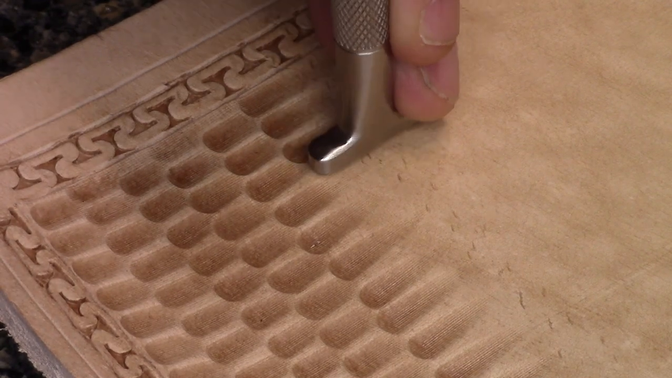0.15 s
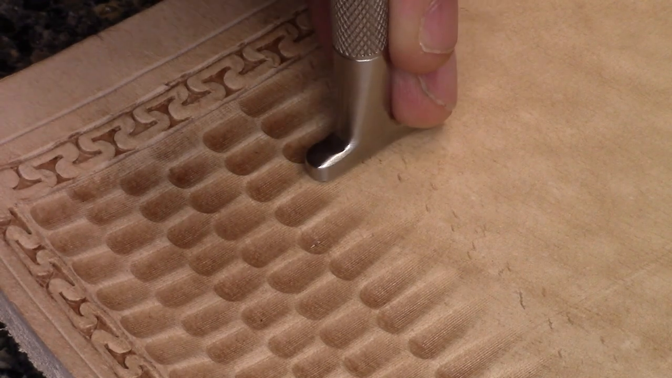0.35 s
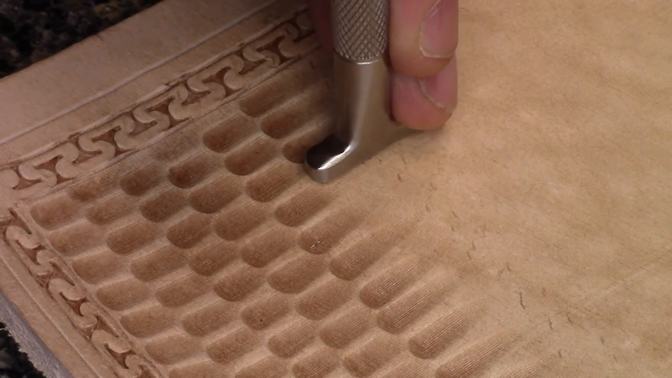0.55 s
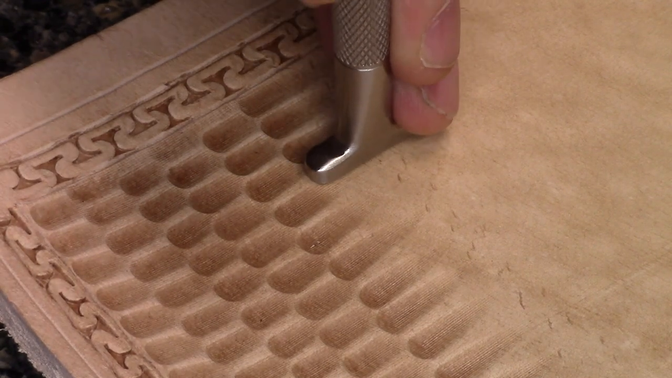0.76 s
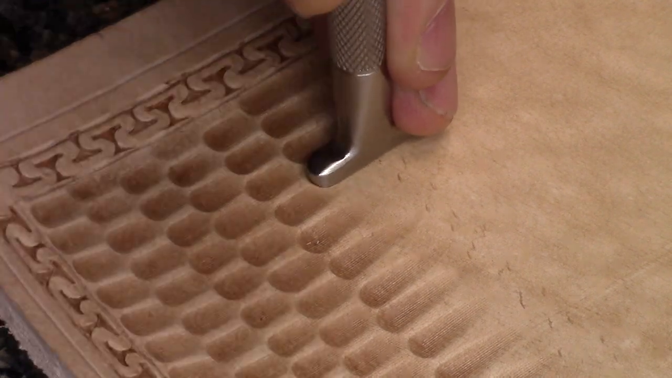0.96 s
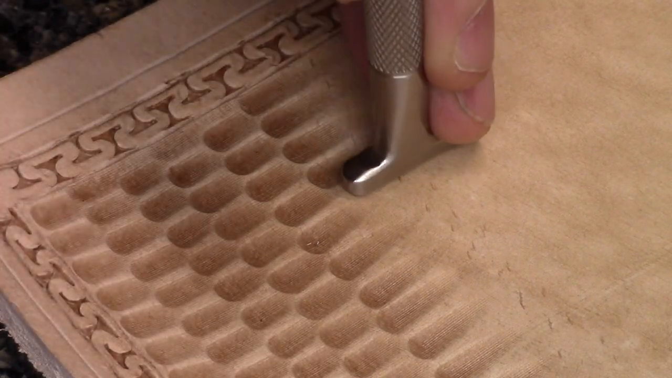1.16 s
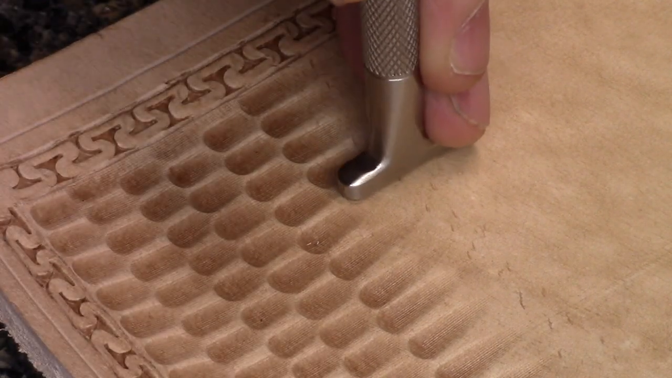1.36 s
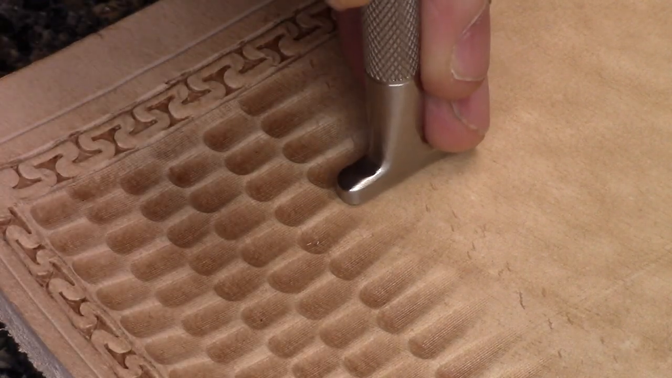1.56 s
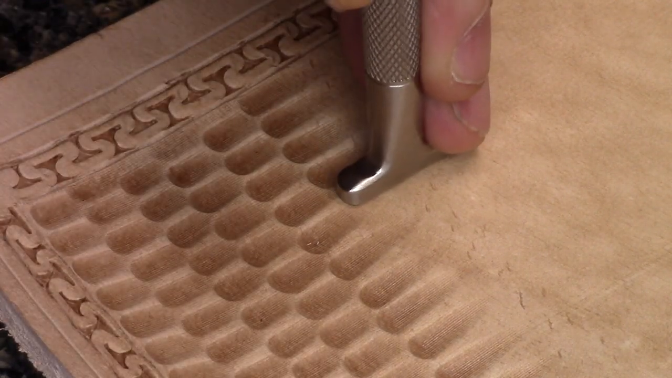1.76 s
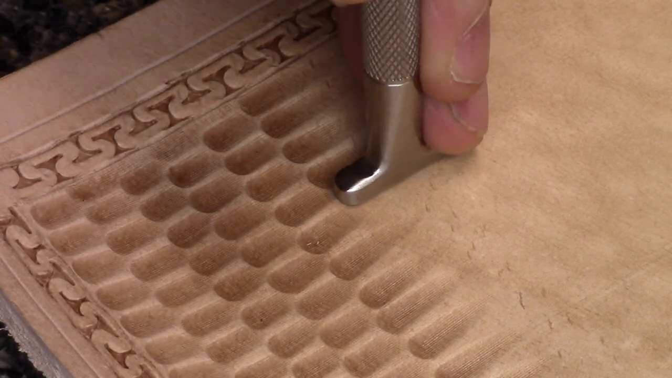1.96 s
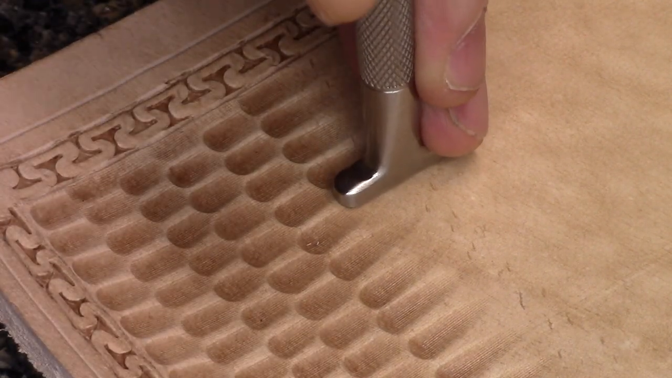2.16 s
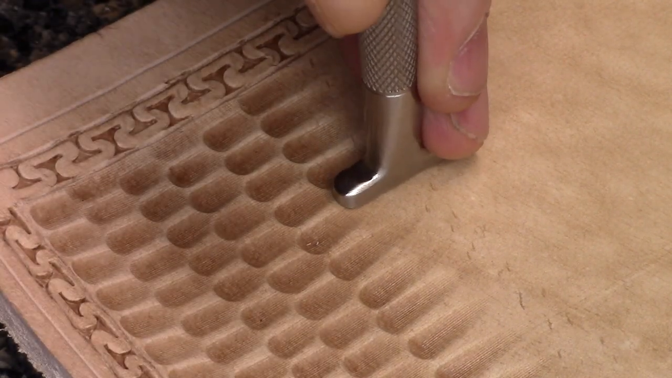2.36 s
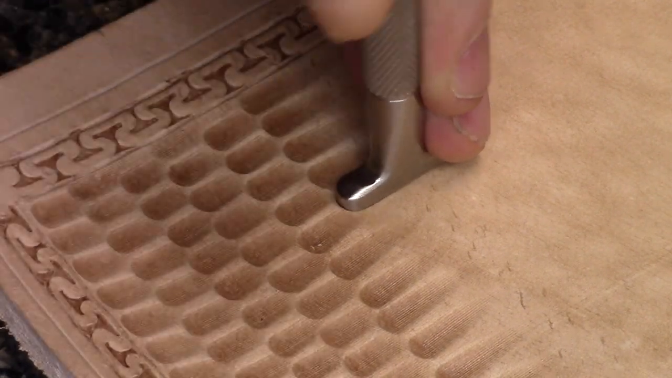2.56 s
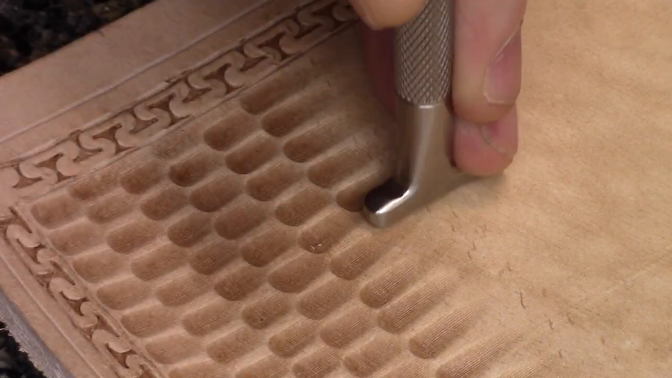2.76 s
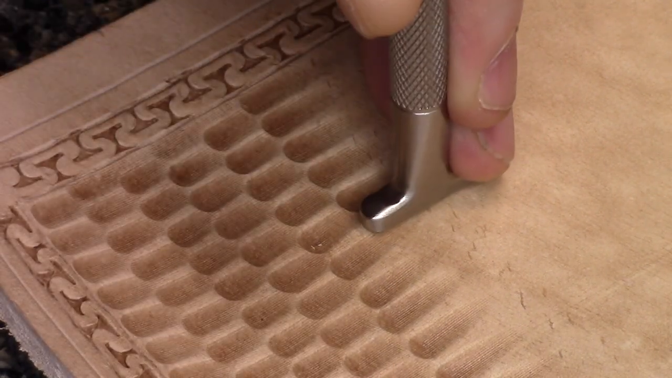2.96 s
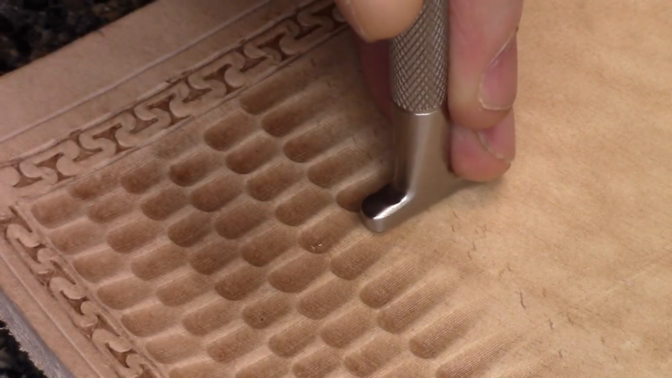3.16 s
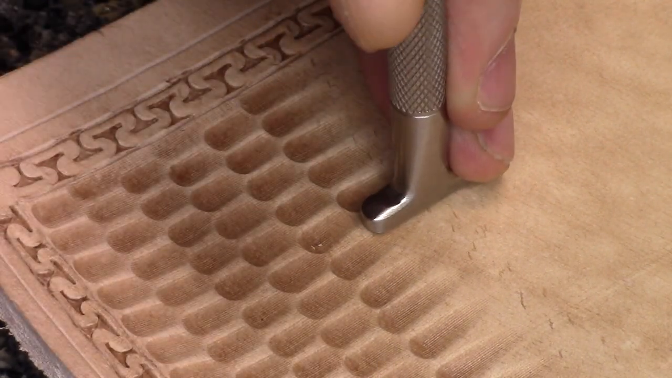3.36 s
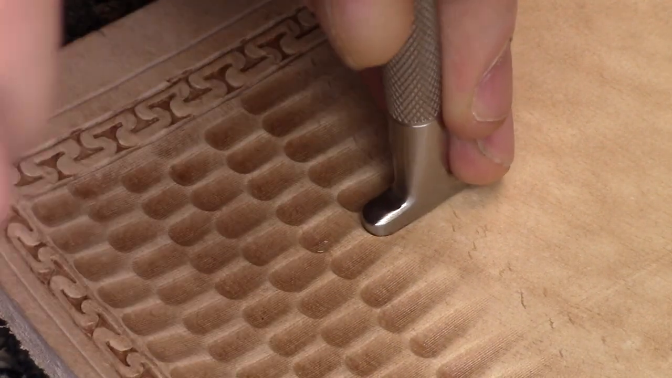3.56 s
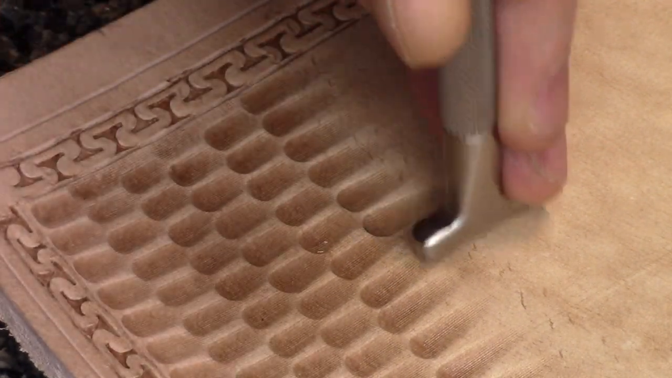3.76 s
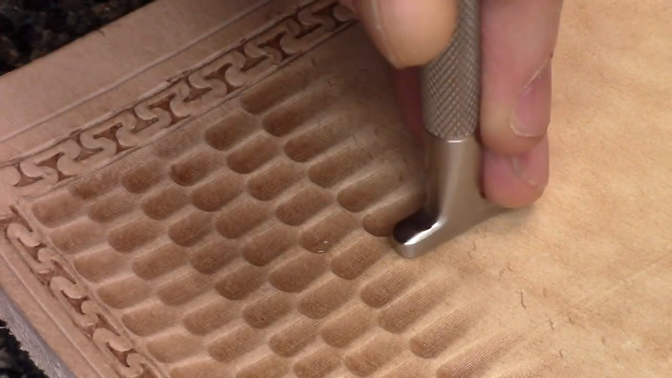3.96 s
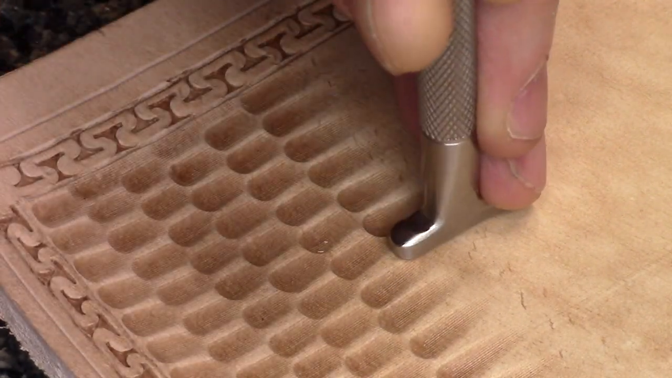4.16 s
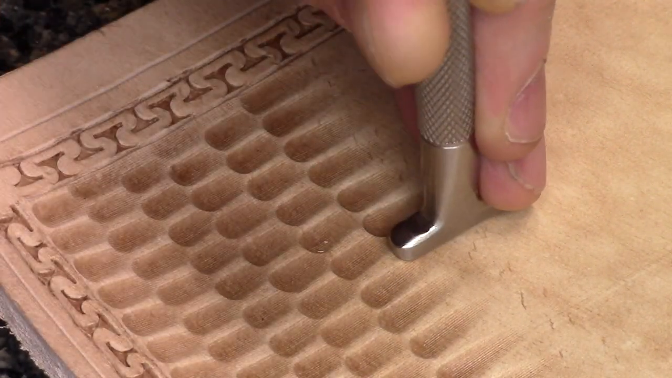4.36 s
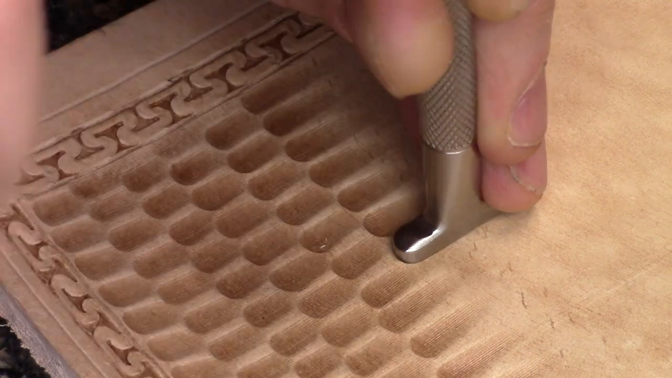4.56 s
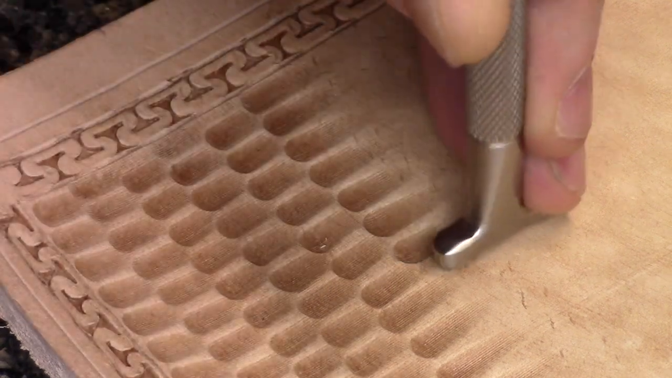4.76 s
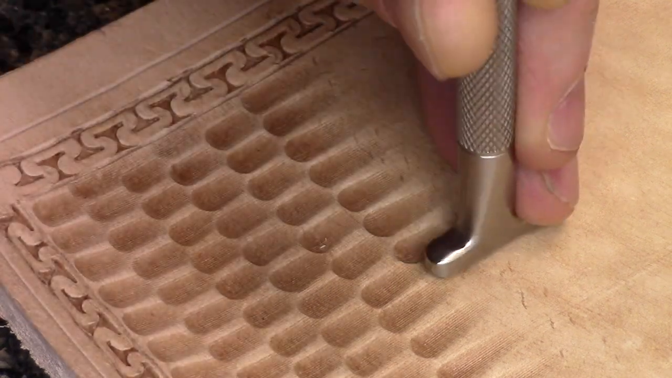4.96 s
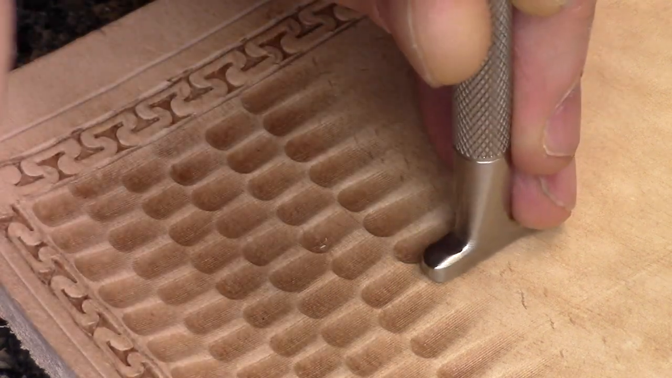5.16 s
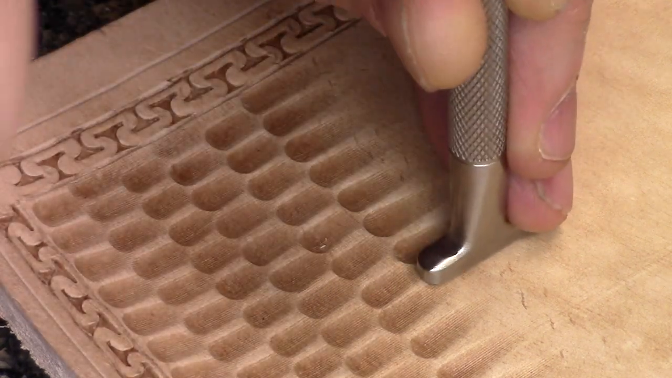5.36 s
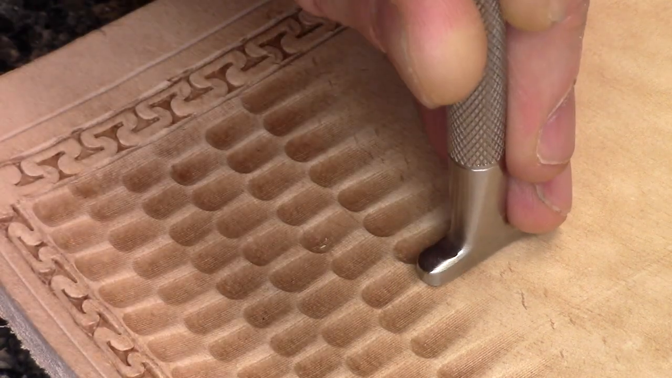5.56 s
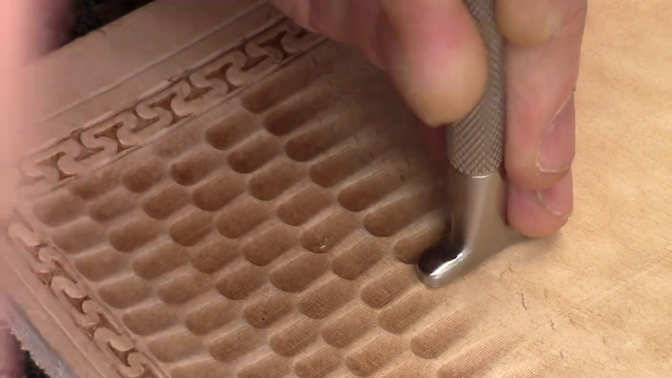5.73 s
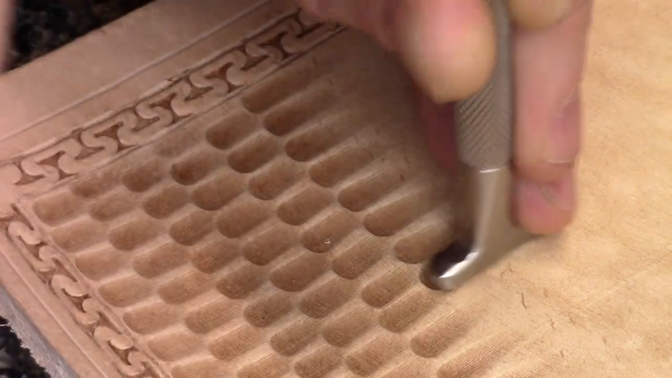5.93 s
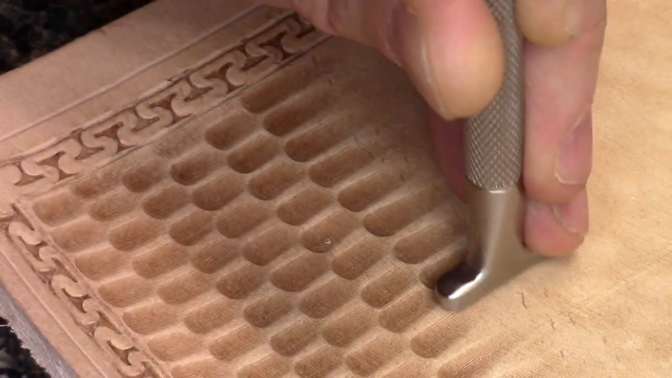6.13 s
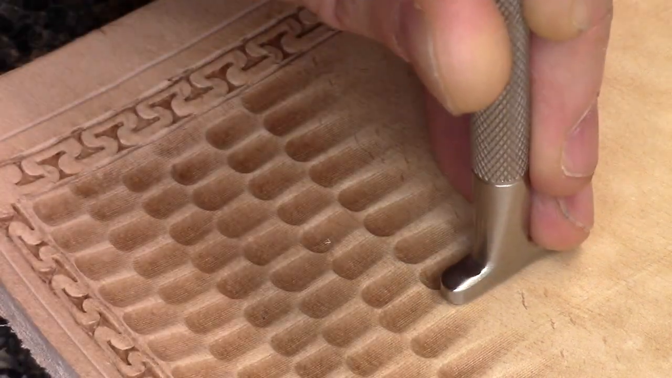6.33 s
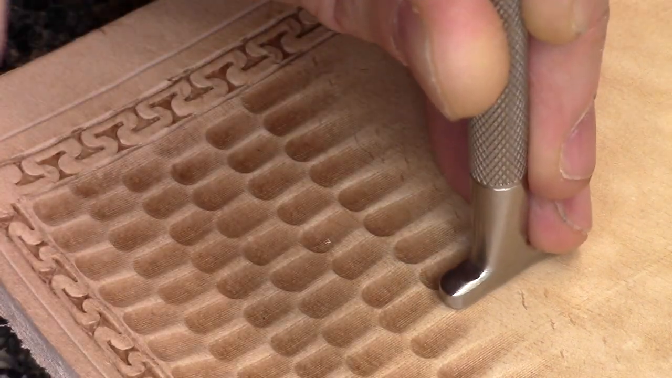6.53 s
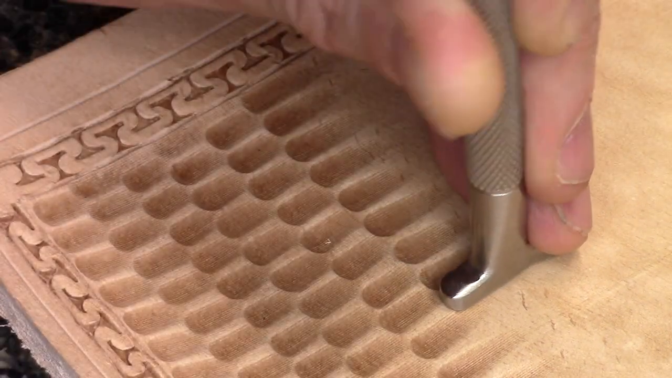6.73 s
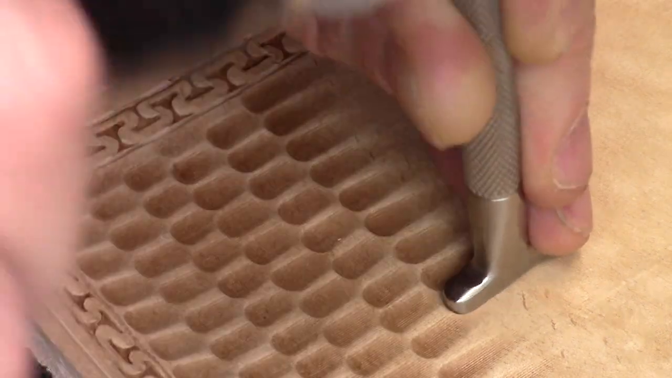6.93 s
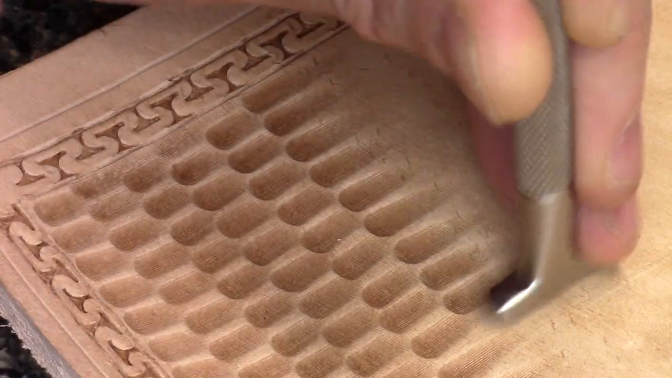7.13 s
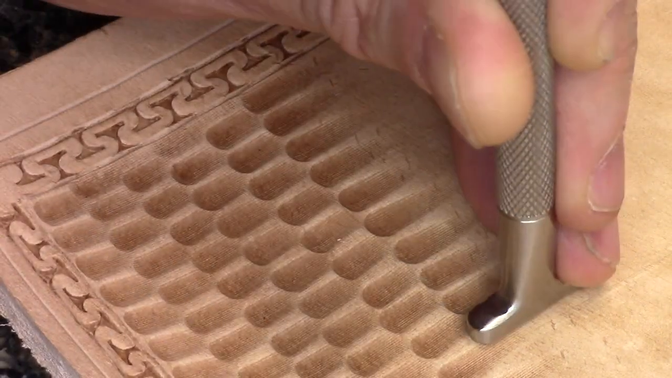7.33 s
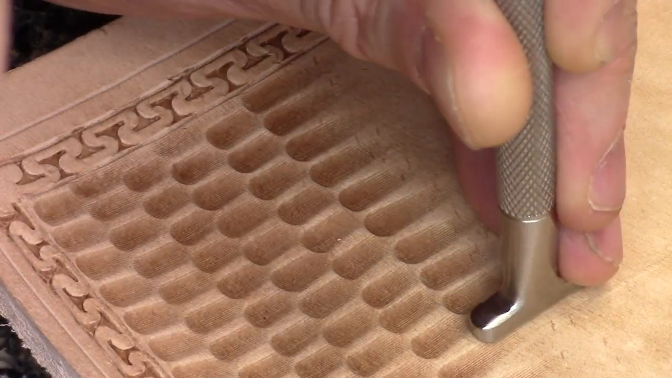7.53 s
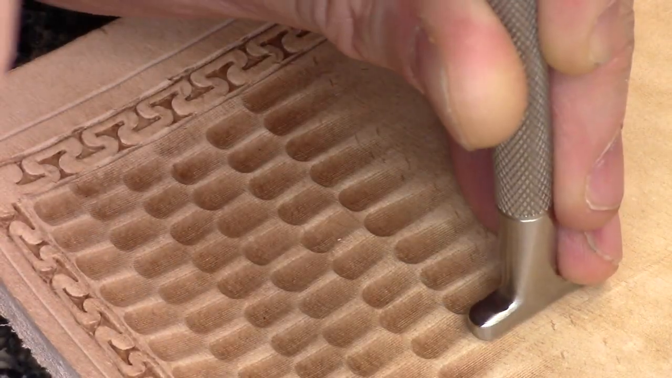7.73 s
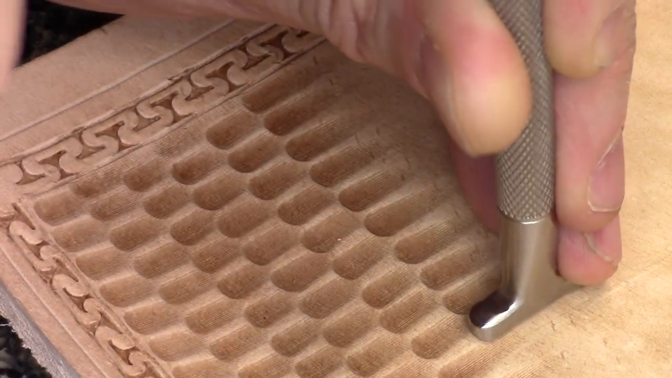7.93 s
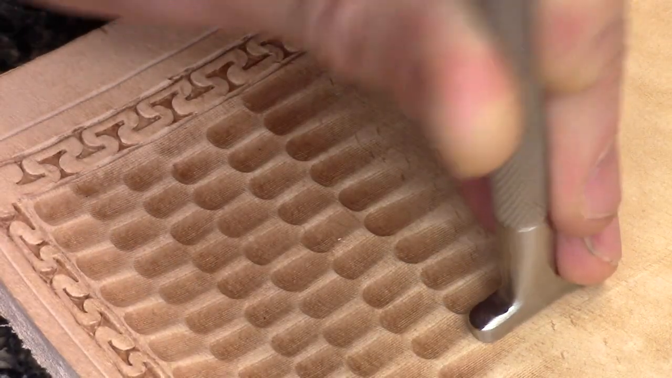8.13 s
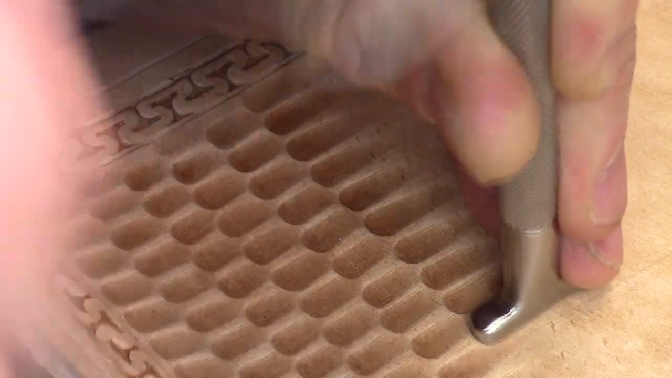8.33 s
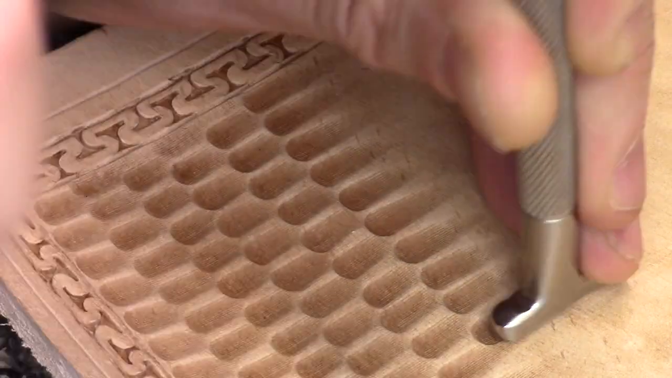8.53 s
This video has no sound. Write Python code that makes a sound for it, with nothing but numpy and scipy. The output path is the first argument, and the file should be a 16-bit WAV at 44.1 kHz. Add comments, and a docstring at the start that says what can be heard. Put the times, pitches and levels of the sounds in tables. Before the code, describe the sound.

Close-up in a small workshop, a mallet hits a steel stamp on leather over a stone counter, seven single blows at slightly uneven intervals. Each is a bright crack with a woody low thud and brief boxy reverberation. Faint tool ticks and quiet room hum fill the gaps. Early blows sound squashed and overloaded; later ones are quieter.

```python
"""A mallet drives a steel stamp into leather on a stone counter, about once a second, in a small workshop.
Room air, a faint hum and a thin whine run throughout; the sound begins inside the ring of a first blow.
Each blow is a crack (noise and short steel modes), then a thud (counter modes), echoes and a room ring.
Between blows come faint puffs of hiss as the stamp is set down. A limiter flattens the early blows most;
the input level then slides down, and dips and returns after each blow."""
import sys
import numpy as np
from scipy import signal
from scipy.fft import rfft, irfft
from scipy.io import wavfile
from scipy.ndimage import uniform_filter1d, minimum_filter1d

SR = 44100
rng = np.random.default_rng(int(sys.argv[2]) if len(sys.argv) > 2 else 0)


def pcm_store(signal):
    """Save signal as 16-bit PCM."""
    levels = np.round(np.clip(np.atleast_2d(signal), -1, 1) * 32767)
    wavfile.write(sys.argv[1], SR, levels.astype(np.int16).T)


N = 378819
T = np.arange(int(.8 * SR)) / SR  # time inside one blow or touch, in seconds

# mallet blows: (time [s], force [dB], crack relative to force [dB], crack pitch [Hz], steel ping pitch [Hz])
MALLET_BLOWS = [(-.215, -4, 11, 3370, 9700), (0.8689, -3, 4, 3426, 12230), (2.4006, -3, 9, 3494, 12230),
                (3.4574, -4.5, 10, 3487, 9700), (4.4362, -6, 4, 3370, 10900), (5.7213, -6, 9.5, 3765, 9700),
                (6.8351, -6, -0.5, 3264, 9700), (8.3157, -6, -2, 3514, 7620)]


def amp(db):
    """Turns decibels into a gain."""
    return 10 ** (np.asarray(db) / 20)


def evened(x):
    """Scales a sound to an average (rms) level of 1."""
    return x / np.sqrt(np.mean(x ** 2) + 1e-20)


def read(points, hz):
    """Reads a table between its points, along a log-frequency axis."""
    point_hz, value = np.transpose(points)
    return np.interp(np.log(hz + 1), np.log(point_hz + 1), value)


def add(mix, s, sound):
    """Mixes a sound in at time s, which may lie before the start."""
    at = round(s * SR)
    sound = sound[..., max(-at, 0):]
    part = mix[..., max(at, 0):][..., :sound.shape[-1]]
    part += sound[..., :part.shape[-1]]


def cut_bass(x, hz, order=2):
    """A plain high-pass: weakens what lies below hz."""
    return signal.sosfilt(signal.butter(order, hz, "high", fs=SR, output="sos"), x)


def noise(spectrum, size, side_db=0):
    """Coloured noise at two close microphones: mostly shared (mid), with a small difference (side)."""
    # how much the microphones differ, before side_db: (frequency [Hz], side minus mid [dB])
    width = [(30, -8), (125, -29.5), (500, -24.5), (1200, -17.5), (3500, -25.5), (12000, -26)]
    hz = np.fft.rfftfreq(size, 1 / SR)
    colour = amp(read(spectrum, hz))
    mid, side = (evened(irfft(rfft(white) * colour, size)) for white in rng.standard_normal((2, size)))
    side = irfft(rfft(side) * amp(read(width, hz) + side_db), size)
    return np.array([mid + side, mid - side])


def ring(modes):
    """Struck modes: pure tones that each die at their own speed, by 60 dB in t60 seconds."""
    return sum(amp(db - 60 * T / t60) * np.sin(2 * np.pi * hz * T) for hz, db, t60 in modes)


def crack(hz, snap_db=-13.5, snap_time=0.0023, contact=0.0015, right_db=1.1):
    """Mallet on steel: a snap of contact noise and a few modes that the fingers stop at once."""
    # stamp held in the fingers: (multiple of the crack pitch, relative level [dB], t60 [s])
    stamp = [(0.551, -19, 0.0068), (.69, -16.5, 0.026), (.8, -18, 0.0027), (.92, -11, 0.015),
             (1.01, -7.5, 0.016), (1.34, -7.5, 0.0046), (1.8, -26.5, 0.0057), (2.2, -26.5, 0.0077),
             (2.6, -33, 0.0095)]
    # colour of the snap: (frequency [Hz], relative level [dB])
    band = [(500, -16.5), (2000, 10.5), (4900, 1), (5800, -8.5), (9300, -9.5), (12000, -15.5), (16000, -26.5)]
    snap = amp(snap_db) * noise(band, len(T), side_db=-2.5) * np.exp(-T / snap_time)
    steel = ring([(hz * ratio, db, t60) for ratio, db, t60 in stamp])
    onset = 1 - np.exp(-T / contact)
    return (snap - steel) * onset * amp([[0], [right_db]])  # a little louder on the right


def thud():
    """The leather cushions the push, so the counter answers just after the crack."""
    # counter under the leather: (frequency [Hz], relative level [dB], t60 [s])
    counter = [(192.6, -4.5, 0.11), (222.4, -8.5, 0.097), (308, -0.5, .096), (326.2, -11.5, 0.17),
               (509, -4, 0.035), (603, -4.5, 0.026), (787, -18.5, 0.048), (964, -19.5, .022),
               (1629, -14.5, 0.035), (2126, -16, 0.017), (2510, -15.5, 0.013)]
    lag, contact = .0003, .001  # seconds
    out = np.zeros(len(T))
    add(out, lag, ring(counter) * (1 - np.exp(-T / contact)))
    return out


def dying(sound, rise, cycles):
    """Lets noise build up, the bass over several cycles, then die band by band as the room absorbs it."""
    # how fast the room absorbs each pitch: (frequency [Hz], t60 [s])
    tail_t60 = [(60, 0.088), (200, .44), (500, 0.33), (1500, 0.28), (3500, 0.38), (7000, 0.31),
                (14000, 0.27)]
    hz, t, bands = signal.stft(sound, SR, nperseg=256)
    fade = amp(-60 * t / read(tail_t60, hz)[:, None])
    build_up = 1 - np.exp(-t * np.maximum(hz, 200)[:, None] / cycles)
    shaped = signal.istft(bands * fade * build_up, SR, nperseg=256)[1][:, :len(T)]
    return shaped * (1 - np.exp(-T / rise))


def shank_ring(ring_db=-38.0, ring_t60=0.32):
    """A soft, fuzzy ring of the steel lingers in the room, made of fading noise."""
    # colour of the ring: (frequency [Hz], relative level [dB per Hz])
    shank = [(1800, -30), (2800, -15.5), (3250, -9), (3390, 0.5), (3550, -6.5), (3820, 3), (3980, -12),
             (5000, -18.5), (6000, -26.5), (10000, -31.5), (15500, -41)]
    return amp(ring_db) * noise(shank, len(T)) * np.exp(-np.log(1000) * T / ring_t60)


def blows(tail_db=-16.0, fresh_db=-21, modes_db=0, swell=0.016, ping_t60=0.24, radiate_hz=150):
    """Every blow lands on nearly the same spot, so the room answers much alike each time."""
    # standing waves of the room: (frequency [Hz], relative level [dB], t60 [s])
    room_modes = [(119.5, -31, 0.29), (140.7, -20, 0.19), (188.3, -21, .42), (210.8, -24.5, .38),
                  (258.6, -18.5, 0.37), (282.4, -25.5, 0.28), (328, -19.5, 0.23), (412, -28.5, .32),
                  (445, -26.5, 0.42), (495, -22, .3), (548.5, -23, .3), (631, -34.5, 0.46),
                  (719, -34.5, 0.25), (839, -31, 0.16), (1725, -42.5, 0.23), (2380, -43.5, 0.3)]
    # diffuse room sound: (frequency [Hz], relative level [dB per Hz])
    tail = [(25, -50.5), (80, -29.5), (120, -21.5), (183, -8), (330, -3), (410, -7.5), (520, -10),
            (780, -13), (1330, -24), (1620, -19.5), (2400, -27.5), (2950, -33), (9900, -42.5),
            (15500, -60.5)]
    # first reflections off the bench and walls: delay [s]
    echoes = [.0023, .0071, 0.0111, .0152, .0312, 0.041]
    # harder blows bring out the ping: its level relative to a blow of 0 dB force,
    # and how many dB that changes for each dB of force
    ping_db, ping_per_force = -42.5, 2.4
    # the thud comes back weaker the longer its path; the crack scatters about equally from every surface
    echo_thud_db, echo_fade_db_per_s, echo_crack_db = 0.5, 549.5, -23.5

    out = np.zeros((2, N))
    standing = amp(modes_db) * ring(room_modes) * (1 - np.exp(-(T / swell) ** 2))
    room = standing + amp(tail_db) * dying(noise(tail, len(T)), rise=.0035, cycles=3)
    body = cut_bass(thud(), radiate_hz)  # the slab radiates little deep bass
    for s, force_db, crack_db, crack_hz, ping_hz in MALLET_BLOWS:
        steel = amp(crack_db) * crack(crack_hz)
        ping = ring([(ping_hz, ping_db + ping_per_force * force_db, ping_t60)])
        blow = body + steel + room + ping
        # room sound drawn afresh for each blow
        blow += amp(fresh_db) * dying(noise(tail, len(T)), rise=.0015, cycles=1.3)
        blow += amp(crack_db) * shank_ring()
        for delay in echoes:
            thud_gain = amp(echo_thud_db - echo_fade_db_per_s * delay)
            add(blow, delay, thud_gain * body + amp(echo_crack_db) * steel)
        add(out, s, amp(force_db) * blow)
    return out


def air(air_db=-72, side_db=10):
    """Steady room noise, with a faint hum and a thin whine made of pure tones."""
    # room air: (frequency [Hz], relative level [dB per Hz])
    air_colour = [(15, -51.5), (25, -26), (49, -5.5), (86, -10.5), (113, -6), (173, 5), (215, 1), (253, 3),
                  (523, -1.5), (684, -8), (848, -7), (1170, -11.5), (5580, -22.5), (11200, -30.5),
                  (15500, -36)]
    # hum and whine, before the input level: (frequency [Hz], level [dB rms])
    hum_tones = [(59.2, -83.5), (118.8, -84), (248, -88), (5561, -104)]
    t = np.arange(N) / SR
    hum = sum(amp(db) * evened(np.sin(2 * np.pi * (hz * t + rng.random()))) for hz, db in hum_tones)
    return amp(air_db) * noise(air_colour, N, side_db=side_db) + hum


def touch(db, hz, length, rise=0.00048):
    """Steel brushes leather: a short puff of hiss, strongest around hz."""
    hiss = noise([(hz / 8, -8), (hz / 2, -3), (hz, 0), (hz * 2, -15), (hz * 4, -30)], len(T))
    return amp(db) * hiss * (1 - np.exp(-T / rise)) * np.exp(-T / length)


def ticks():
    """Small skids, ticks and nudges as the stamp finds its next place on the leather."""
    # the stamp is set down before a blow: (time [s], level [dB], pitch [Hz])
    set_downs = [(0.6936, -57.5, 5660), (2.248, -74, 7500), (5.625, -63, 7970), (5.662, -60, 3610),
                 (6.537, -63, 3990), (7.981, -63.5, 7000)]
    tick_s = 0.0018  # decay time
    # it skids just before it settles: lead [s], level [dB], pitch [Hz], decay time [s]
    skid_lead_s, skid_db, skid_hz, skid_s = .009, -76.5, 8960, .012
    # fainter, duller nudges come at random
    nudges_per_s, nudge_db, nudge_spread_db, nudge_hz, nudge_s = 1.1, -75.5, 1.5, 2731, .006

    out = np.zeros((2, N))
    for s, db, hz in set_downs:
        add(out, s - skid_lead_s, touch(skid_db, skid_hz, skid_s))
        add(out, s, touch(db, hz, tick_s))
    for place, strength in rng.random((round(nudges_per_s * N / SR), 2)):
        db = nudge_db + nudge_spread_db * (2 * strength - 1)
        add(out, place * N / SR, touch(db, nudge_hz, nudge_s))
    return out


def scene():
    """The workbench as heard from close by."""
    return blows() + air() + ticks()


def input_level():
    """The level in dB slides from high to low; the lower it is, the more it dips after each blow."""
    high_db, low_db, slide_start_s, slide_end_s = 15.5, 5, 3.37, 6.37
    # full depth of a dip, and the times after the blow at which it is down, starts back and is back
    dip_db, down_s, held_s, back_s = 4, .3, .72, 1.33
    t = np.arange(N) / SR
    slid = np.interp(t, [slide_start_s, slide_end_s], [0, 1])
    dips = sum(np.interp(t - blow[0], [0, down_s, held_s, back_s], [0, 1, 1, 0]) for blow in MALLET_BLOWS)
    return high_db + slid * (low_db - high_db - dip_db * np.minimum(dips, 1))


def limit(x, ceiling_db, recovery_db=235, size=70):
    """A look-ahead limiter that hears a few milliseconds of power, so the sharpest peaks slip through."""
    power = abs(uniform_filter1d((x ** 2).mean(0), 220))  # abs guards against rounding below zero
    over_db = np.maximum(10 * np.log10(power + 1e-12) - ceiling_db, 0)
    fall = np.arange(N) * recovery_db / SR  # recovers by recovery_db a second
    held_db = np.maximum.accumulate(over_db + fall) - fall
    early_db = minimum_filter1d(-held_db, 2 * size)  # turns down ahead of the blow
    return x * amp(uniform_filter1d(early_db, size))


def saturate(x):
    """The peaks that pass the limiter are rounded off below full scale."""
    return x / (1 + x ** 8) ** (1 / 8)


def record(dry):
    """Input level, limiter, overload, bass cut and removal of the highest treble."""
    edge_hz = 15800
    limited = saturate(limit(dry * amp(input_level()), ceiling_db=-4.5))
    trimmed = cut_bass(limited, 52, order=3)
    low_pass = signal.firwin(511, edge_hz, window=("kaiser", 9), fs=SR)
    return signal.oaconvolve(trimmed, low_pass[None], "same")


dry = scene()
out = record(dry)
pcm_store(out)
```